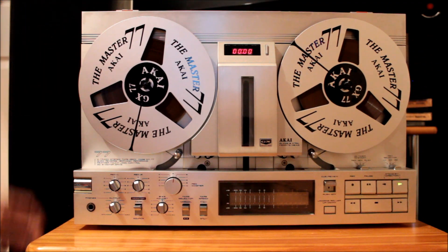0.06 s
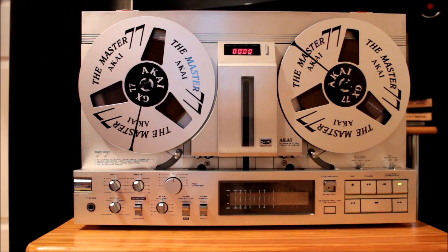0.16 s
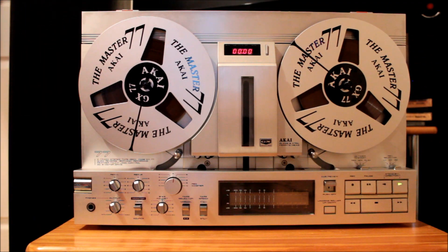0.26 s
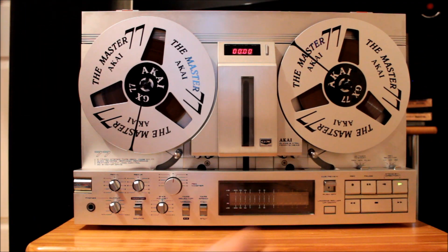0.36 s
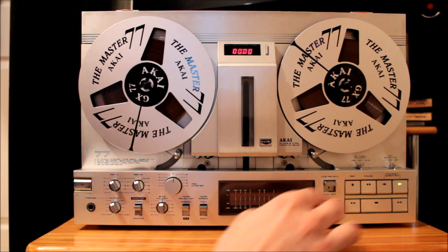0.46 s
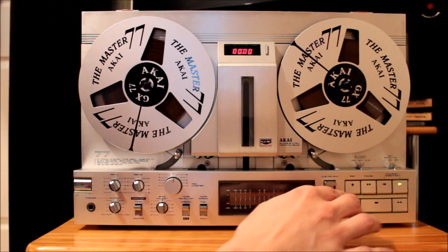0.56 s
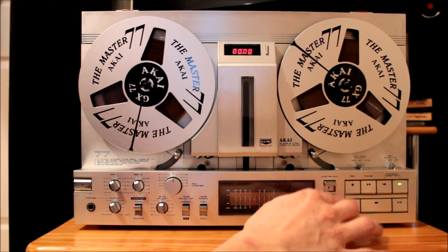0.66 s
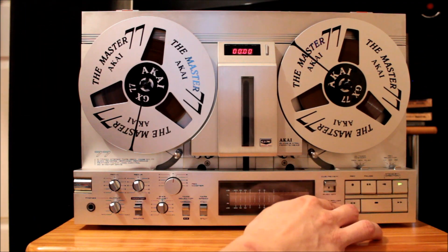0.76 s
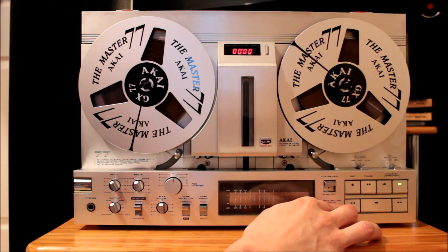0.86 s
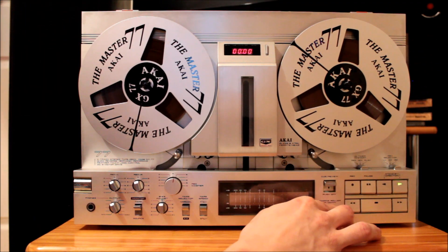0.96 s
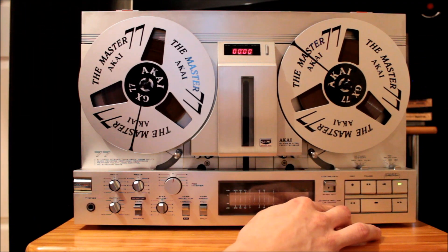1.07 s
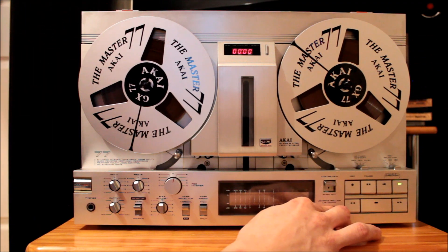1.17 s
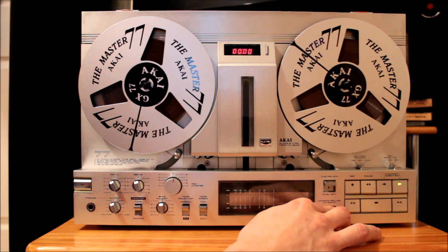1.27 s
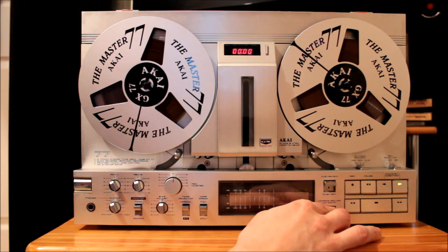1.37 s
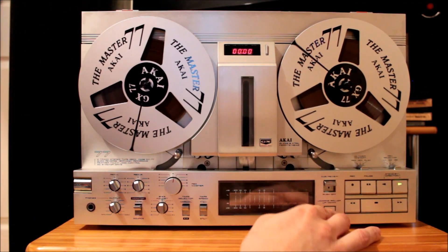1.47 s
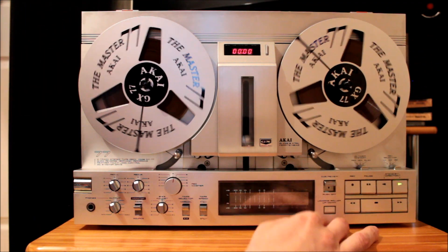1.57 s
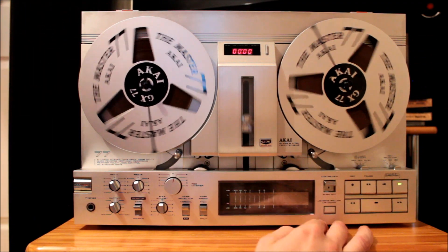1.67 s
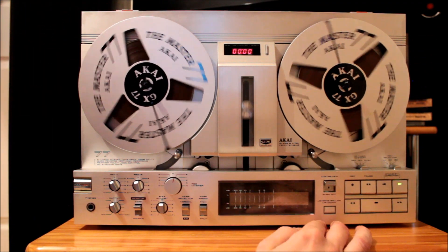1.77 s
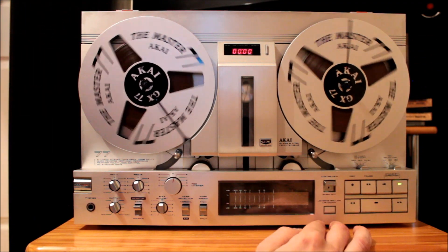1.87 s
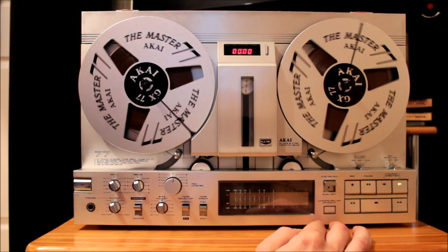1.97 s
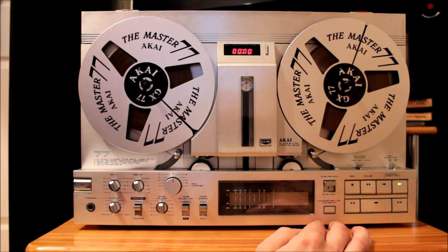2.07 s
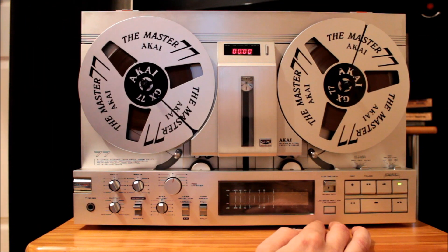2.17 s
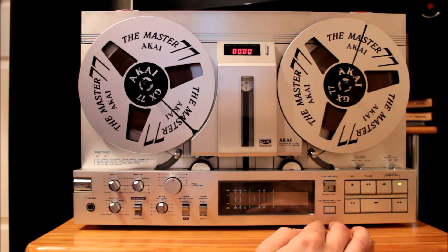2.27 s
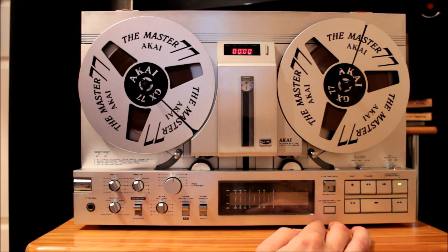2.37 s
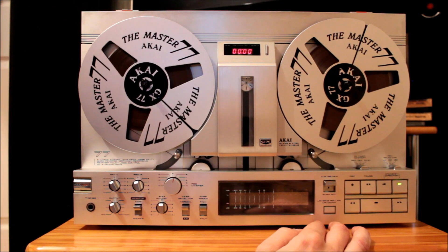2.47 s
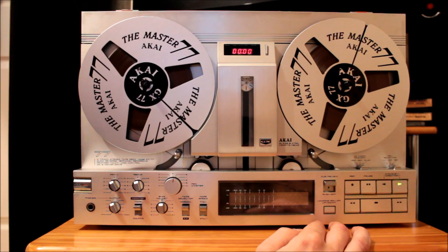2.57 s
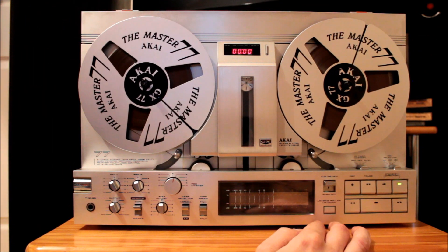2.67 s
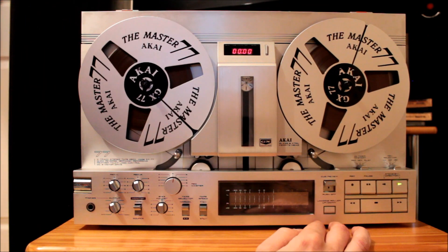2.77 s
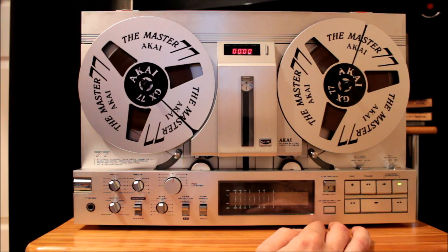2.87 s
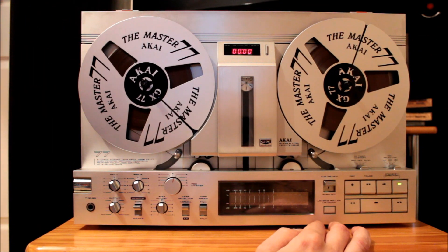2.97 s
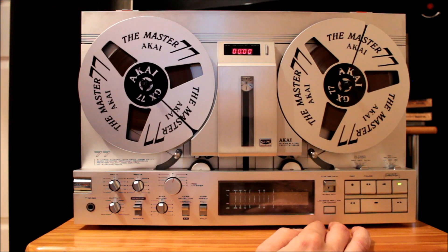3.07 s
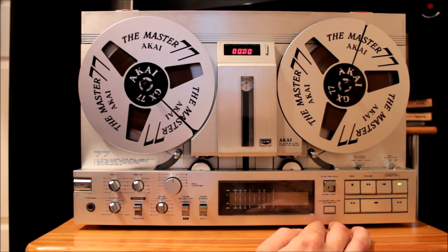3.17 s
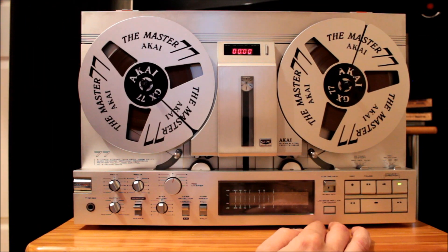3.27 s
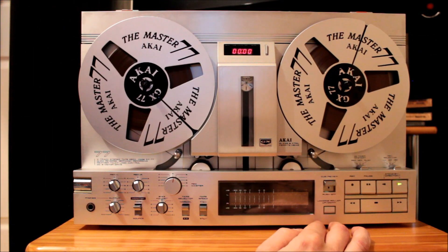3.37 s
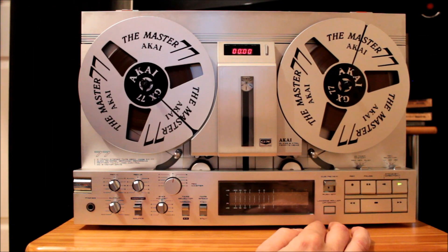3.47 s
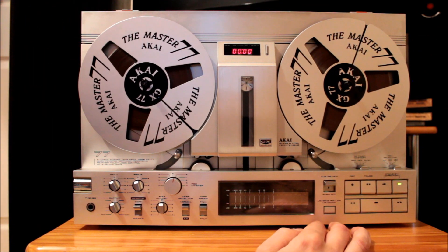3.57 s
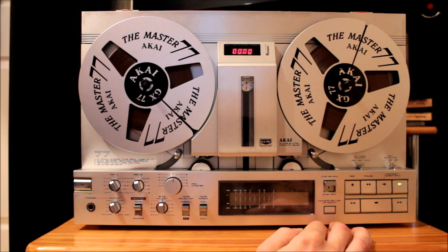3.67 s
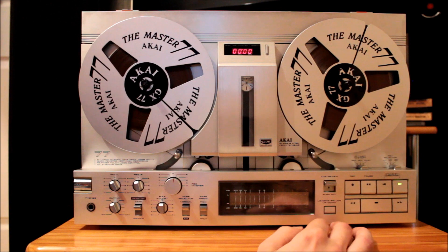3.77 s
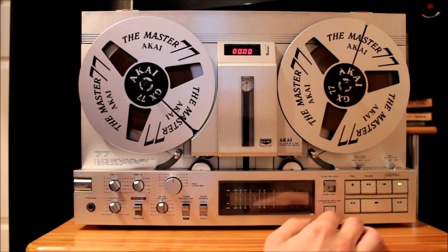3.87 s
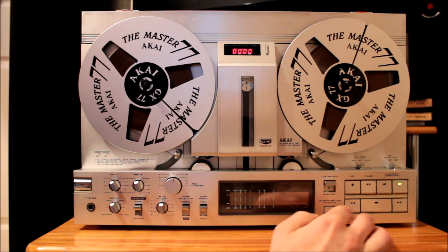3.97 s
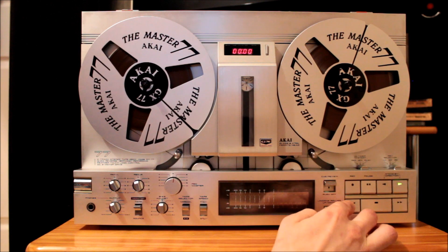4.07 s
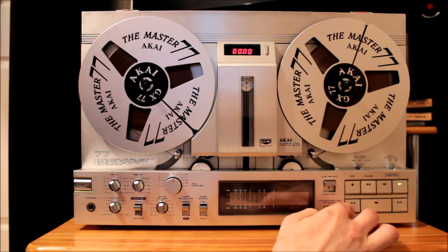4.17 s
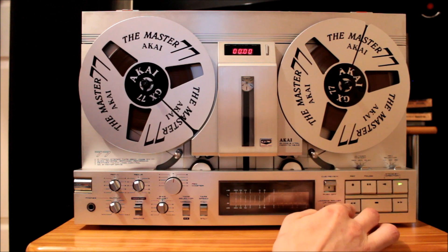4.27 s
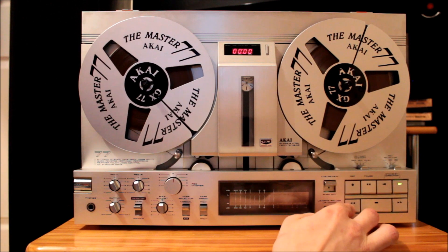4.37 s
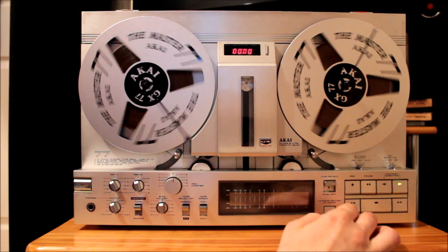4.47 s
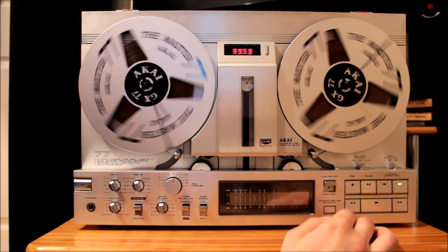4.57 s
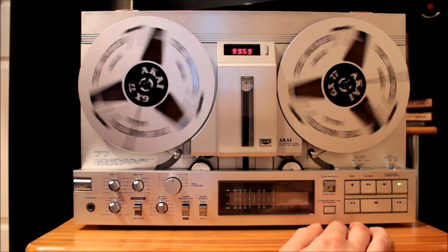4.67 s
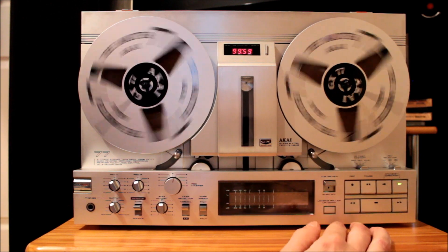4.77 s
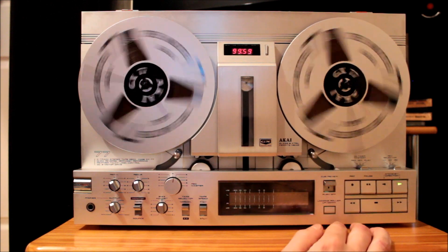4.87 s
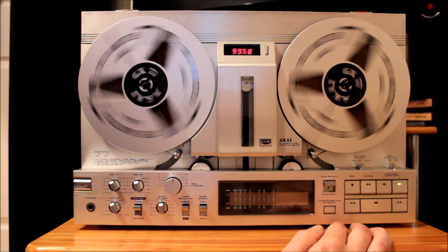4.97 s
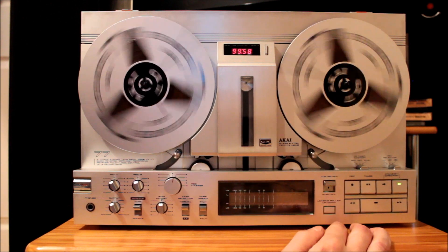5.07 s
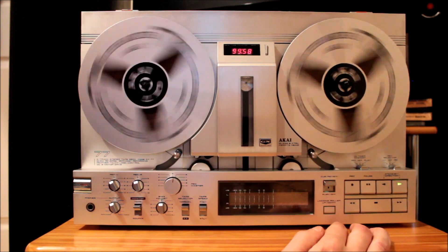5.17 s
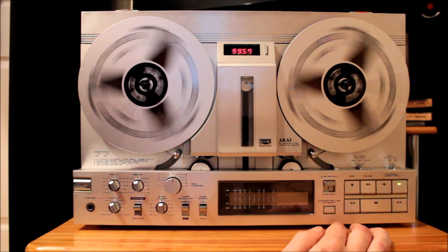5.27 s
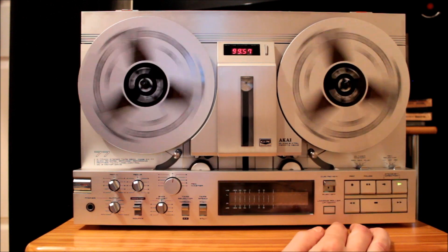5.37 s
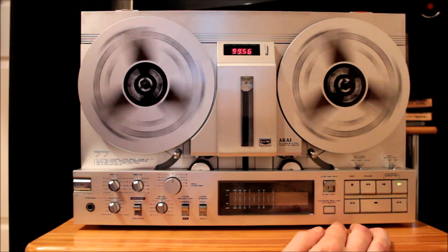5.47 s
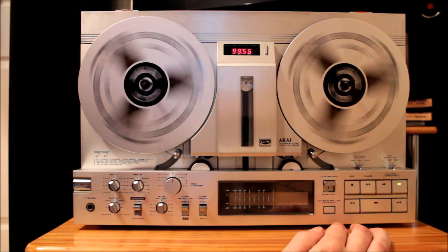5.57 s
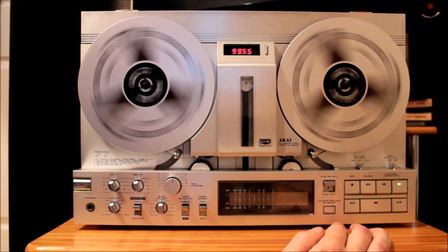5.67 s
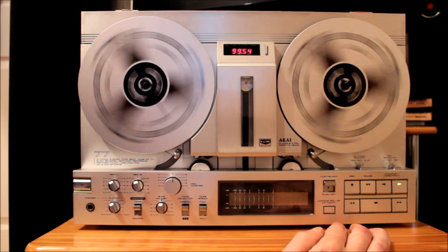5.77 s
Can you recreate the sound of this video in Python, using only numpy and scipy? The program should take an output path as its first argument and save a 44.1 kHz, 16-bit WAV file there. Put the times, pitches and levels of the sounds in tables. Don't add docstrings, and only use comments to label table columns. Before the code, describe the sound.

Faint sleeve rustle, then a tape deck's metallic key clacks and brief motor whir, a pause, a loud solenoid clunk, and hissing reels speeding up.

```python
import sys
import numpy as np
from scipy import signal
from scipy.fft import rfft, irfft
from scipy.io import wavfile
from scipy.ndimage import uniform_filter1d

SR = 44100
rng = np.random.default_rng(int(sys.argv[2]) if len(sys.argv) > 2 else 0)


def gain_from_db(level_db):
    decades = np.asarray(level_db, float) / 20
    return 10 ** decades


def transcribe(u):
    v = np.clip(np.atleast_2d(u).T, -1, 1)
    q = np.round(v * 32767).astype(np.int16)
    wavfile.write(sys.argv[1], SR, q)


N = 256662


def rms_one(x):
    return x / np.sqrt(np.mean(x ** 2) + 1e-20)


def level_curve(rows):
    time_s, level_db = np.transpose(rows)
    return np.interp(np.arange(N) / SR, time_s, level_db)


def at_hz(points, hz):
    point_hz, value = np.transpose(points)
    return np.interp(np.log(hz + 1), np.log(point_hz), value)


def coloured(spectrum):
    hz = np.fft.rfftfreq(N, 1 / SR)
    low_cut = 1 / (1 + (0.8 * spectrum[0][0] / (hz + 1)) ** 6)
    white = rfft(rng.standard_normal(N))
    return rms_one(irfft(white * gain_from_db(at_hz(spectrum, hz)) * low_cut, N))


def drift(rate_hz):
    knots_per_s = 40
    knots = rng.standard_normal(int(N / SR * knots_per_s) + 2)
    r = np.exp(-2 * np.pi * rate_hz / knots_per_s)
    wander = rms_one(signal.lfilter([1], [1, -r], knots))
    return np.interp(np.linspace(0, len(knots) - 1, N), np.arange(len(knots)), wander)


def resonance(x, hz, width_hz):
    r = np.exp(-np.pi * width_hz / SR)
    zeros = np.array([1, 0, -1]) * (1 - r * r) / 2
    return signal.lfilter(zeros, [1, -2 * r * np.cos(2 * np.pi * hz / SR), r * r], x)


def swell(s, rise_ms, t60_ms):
    t_ms = np.arange(int(0.4 * SR)) / SR * 1000
    rise_ms = max(rise_ms, 0.1)
    start = round(s * SR)
    decay = gain_from_db(-60 * (t_ms - rise_ms) / max(t60_ms, 1))
    return slice(start, start + len(t_ms)), np.minimum(t_ms / rise_ms, decay)


def contacts(rows, body_db, rise_ms):
    full = []
    for s, peak_db, high_db, t60_ms in rows:
        low_db = body_db + 0.6 * (peak_db + 26) - peak_db
        full.append((s, peak_db, low_db, high_db, rise_ms * gain_from_db(0.89 * high_db), t60_ms))
    return full


def rattle(rows, modes, rough_db):
    unevenness = np.minimum(rng.exponential(1, N), 3)
    grit = rms_one(rng.standard_normal((3, N)) * gain_from_db(rough_db * unevenness))
    drive = np.full((3, N), 1e-9)
    for s, peak_db, low_db, high_db, rise_ms, t60_ms in rows:
        at, shape = swell(s, rise_ms, t60_ms)
        drive[:, at] += gain_from_db(peak_db + np.array([[low_db], [0], [high_db]])) * shape
    hit = 0
    for level, grains, edges_hz in zip(drive, grit, [(300, 1000), (1000, 3500), (3500, 19000)]):
        evened = np.sqrt(SR / 2 / (edges_hz[1] - edges_hz[0]))
        band = signal.butter(3, edges_hz, "band", fs=SR, output="sos")
        hit = hit + evened * signal.sosfilt(band, level * grains)
    for hz, width_hz, db in modes:
        hit = hit + (gain_from_db(np.clip(db, -6, 8)) - 1) * resonance(hit, hz, width_hz)
    return hit


# (frequency [Hz], density [dB per Hz])
RUMBLE = [(15, -52), (25, -23), (59, -19), (82, -14.5), (134, -5), (156, -8), (220, 0), (257, -9),
          (290, -4.5), (321, -6.5), (468, -9.5), (659, -11.5), (977, -11), (1060, -13.5), (1500, -20.5),
          (1950, -31), (3300, -120)]
# (frequency [Hz], density [dB per Hz])
HISS = [(880, -51), (1500, -6), (1720, 3), (1870, -4), (3310, -8.5), (5330, -7), (7390, -11), (13100, -3.5),
        (16000, -7.5)]
# (frequency [Hz], width [Hz], level [dB rms])
ROOM_TONES = [(94, 6.9, -63), (139, 39, -76), (208, 15, -67), (232, 19, -61.5), (292, 40, -67.5),
              (1000, 16, -80)]


def room_floor():
    rumble_db, hiss_db = -50.5, -57
    white = rng.standard_normal(N)
    tones = sum(gain_from_db(db) * rms_one(resonance(white, hz, width_hz)) for hz, width_hz, db in ROOM_TONES)
    rumble = gain_from_db(rumble_db - 0.5 + 0.24 * drift(5.6)) * coloured(RUMBLE)
    return rumble + tones + gain_from_db(hiss_db) * coloured(HISS)


# (start [s], attack [s], end of hold [s], level [dB])
SLEEVE = [
    (0.0, 0.2, 0.31, -52.5),
    (0.382, 0.21, 0.61, -55.5),
    (.722, .012, 0.69, -67),
    (.82, .012, .9, -65),
    (1.096, .012, 1.11, -59),
]
# (frequency [Hz], density [dB per Hz])
CLOTH = [(1200, -12), (2200, -3.5), (4000, -5), (8000, -10), (12000, -11), (15500, -15)]


def sleeve():
    rest_db, fade_db_per_s = 14, 149.5
    t, level = np.arange(N) / SR, 0
    for s, attack_s, end_s, db in SLEEVE:
        rising_db = rest_db * (np.clip((t - s) / max(attack_s, 0.001), 0, 1) - 1)
        fading_db = fade_db_per_s * np.maximum(t - end_s, 0)
        level = level + (t >= s) * gain_from_db(db + rising_db - fading_db)
    return level * coloured(CLOTH)


PARTS = {"tabletop": (30, 220, 70), "cabinet": (8, 205, 25), "panel": (5.6, 110, 120),
         "lever": (2.4, 40, 420), "spring": (3.2, 58, 240), "cover": (3, 150, 900),
         "armature": (4, 78, 400), "bell": (5, 300, 40), "shield": (2.4, 250, 1200),
         "plunger": (1, 16, 300), "pawl": (.2, 4, 3000)}
THUDS = {"tabletop": [(1.300, -36, 235.5), (2.030, -40, 187.5), (2.150, -41, 289), (4.510, -37.5, 247.5),
         (4.550, -33, 232)], "cabinet": [(1.268, -27.5, 431), (1.486, -36, 431), (2.135, -30, 400)],
         "panel": [(1.345, -29, 661), (1.600, -41, 630), (2.030, -29.5, 639), (2.130, -30, 655)]}
PINGS = {"lever": [(1.129, -52, 1900), (1.246, -33, 1990), (1.322, -17.5, 1400), (1.439, -31, 1063),
         (1.565, -27, 1450), (2.028, -27, 1285), (2.029, -29, 2250), (2.128, -24, 1790), (1.487, -22, 1700),
         (2.029, -30, 1750)], "spring": [(1.270, -21, 2440), (1.325, -26, 2610), (1.486, -17, 2550),
         (1.564, -24, 2550), (1.578, -29, 2580), (1.607, -26, 2600), (1.650, -34, 2495), (1.678, -38, 2703),
         (4.396, -41, 2610)], "cover": [(1.600, -28, 5390), (2.150, -41, 5640), (4.393, -42, 7550),
         (4.393, -44, 15000),], "shield": [(4.504, -26, 3450), (4.508, -37, 6100)],
         "armature": [(4.490, -24, 1180), (4.496, -21, 1550), (4.493, -21, 1870)],
         "bell": [(4.502, -35, 3160), (4.505, -41, 1102)], "plunger": [(4.4988, -6.5, 3500)],
         "pawl": [(1.2783, -9, 3500), (1.6062, -11, 4500), (1.3225, -14, 1500), (4.4998, -5, 3000)]}


def rings():
    out = np.zeros(N)
    for part, strikes in {**THUDS, **PINGS}.items():
        rise_ms, t60_ms, spread_hz = PARTS[part]
        for s, peak_db, hz in strikes:
            at, shape = swell(s, rise_ms, t60_ms)
            t = np.arange(len(shape)) / SR
            detune, phase = rng.random((2, 30, 1))
            cycles = t * (hz + spread_hz * (detune - 0.5)) + phase
            neighbours = 0.25 * np.sin(2 * np.pi * cycles).sum(axis=0)
            out[at] += gain_from_db(peak_db) * shape * (0.5 * np.sin(2 * np.pi * hz * t) + neighbours)
    return out


# (time [s], peak rms [dB], highs [dB], t60 [ms])
LEVERS = [(1.2462, -34, -7, 63), (1.2655, -22.5, 1.5, 106), (1.2765, -20.5, -5, 39), (1.2885, -29, -1, 50),
          (1.3040, -37, -8, 120), (1.3215, -24.5, -10, 71), (1.3320, -32, -10, 110),
          (1.3575, -32, 1.5, 140), (1.4385, -42.5, -23, 55), (1.4805, -26, 1, 37), (1.4845, -17, 3, 43),
          (1.4930, -27.5, 0, 62), (1.5120, -28.5, 0.5, 105), (1.5640, -30.5, -7, 100), (1.5890, -25, 5, 37),
          (1.5955, -24, 5.5, 42), (1.6045, -25.5, 4.5, 45), (1.6150, -24, -2, 34), (1.6300, -34, 3, 93),
          (1.6790, -39.5, -12, 260), (2.0280, -30, -31, 46), (2.0930, -23.5, 1.5, 57),
          (2.1040, -32, -7, 130), (2.1150, -32.5, -0.5, 160), (2.1295, -22, -0.5, 30),
          (2.1380, -35.5, -5, 140), (2.1600, -47, -1, 49)]
# (frequency [Hz], width [Hz], gain [dB])
CHASSIS = [(431, 21, 8), (655, 43, 8), (1224, 120, 3.5), (2400, 75, 3.5), (3890, 160, 3), (5300, 800, 5),
           (9800, 1800, 2)]


def levers():
    return rattle(contacts(LEVERS, body_db=-35, rise_ms=2.6), CHASSIS, rough_db=1.5)


# (time [s], level [dB])
LOADING = [
    (1.30, -60.5),
    (1.40, -41.5),
    (1.60, -52.5),
    (1.80, -45),
    (2.15, -41),
    (2.24, -77),
    (2.34, -84),
]
# (frequency [Hz], density [dB per Hz])
MOTOR = [(250, -2), (400, -2.5), (760, -1), (1150, -4.5), (1700, -8), (2300, -14), (3200, -18),
         (6000, -25.5), (15000, -28)]
# (multiple of rotation, level [dB])
MOTOR_LINES = [(2, -6), (3, -7.5), (4, 1), (5, -7), (6, -9)]


def loading_motor():
    motor_hz, full_speed_db, sag_hz_per_db = 191.6, -53, 0.13
    level_db = level_curve(LOADING)
    hz = motor_hz + sag_hz_per_db * np.minimum(level_db - full_speed_db, 0)
    turns = 2 * np.pi * np.cumsum(hz * (1 + 0.00591 * drift(5.74))) / SR
    lines = 0
    for k, db in MOTOR_LINES:
        lines = lines + gain_from_db(db + 1.6 * drift(2.2)) * np.sin(k * turns + 6 * rng.random())
    gears = coloured(MOTOR) * gain_from_db(1.2 * drift(10))
    running = level_db > -74
    return gain_from_db(level_db) * running * (gears + gain_from_db(-2.5) * lines)


# (time [s], peak [dB])
TICKS = [
    (2.0800, -48),
    (2.1940, -50),
    (2.2200, -46),
    (2.2400, -51),
    (2.2490, -32),
    (2.2590, -47),
]


def ticks():
    out, white = np.zeros(N), rng.standard_normal(N)
    for s, peak_db in TICKS:
        at, shape = swell(s, 0.38, 5.7)
        out[at] += gain_from_db(peak_db + 5) * shape * white[at]
    return signal.sosfilt(signal.butter(2, 12000, "high", fs=SR, output="sos"), out)


# (time [s], peak rms [dB], highs [dB], t60 [ms])
SOLENOID = [(4.2825, -49, -28, 70), (4.3060, -51, -16, 24), (4.3560, -41.5, -19, 57),
            (4.3825, -45, -23, 24), (4.3905, -36.5, 1.5, 45), (4.4010, -35, -9, 64), (4.4225, -49, 2, 33),
            (4.4845, -31, -30, 20), (4.4885, -22, 1, 50), (4.4935, -23, -3, 40), (4.4985, -16, -1, 22),
            (4.5053, -20, -3, 30), (4.5110, -44, -15, 25), (4.5250, -39, -22, 170)]
# (frequency [Hz], width [Hz], gain [dB])
BRAKE = [(820, 93, 8), (1140, 150, 5.5), (1870, 90, 2), (3440, 160, -1), (4360, 260, 5.5), (5900, 1100, 7),
         (10000, 1700, 7)]


def solenoid():
    return rattle(contacts(SOLENOID, body_db=-35.5, rise_ms=2.3), BRAKE, rough_db=4.0)


# (time [s], level [dB])
WIND = [
    (4.55, -60),
    (4.70, -52),
    (5.45, -47.5),
    (5.82, -45),
]
# (frequency [Hz], density [dB per Hz])
TAPE = [(350, -1), (600, 1.5), (870, 2.5), (1150, -0.5), (1800, -9.5), (2200, -6.5), (3000, -7), (4200, -4),
        (5200, -8), (6000, -9.5), (9000, -11), (12300, -12.5), (15500, -9.5)]
# (frequency [Hz], width [Hz], gain [dB])
GUIDES = [(847, 22, 6.5), (2240, 180, 4.5), (4250, 900, -6.5), (5190, 220, 3), (8150, 210, 2),
          (12400, 550, 6.5)]
# (hiss level [dB], whistle level [dB])
WHISTLE = [(-65, -96), (-57, -74), (-47, -52.5), (-44, -57)]


def fast_wind():
    hiss_db = level_curve(WIND)
    whistle_db = np.interp(hiss_db, *np.transpose(WHISTLE))
    whistle_hz = 4280 * (1 + 0.0078 * drift(1.2))
    friction = coloured(TAPE)
    tape = friction
    for hz, width_hz, db in GUIDES:
        tape = tape + (gain_from_db(db) - 1) * resonance(friction, hz, width_hz)
    low_pass = signal.butter(2, 230, fs=SR, output="sos")
    narrow = signal.sosfilt(low_pass, rng.standard_normal((2, N)))
    turns = 2 * np.pi * np.cumsum(whistle_hz) / SR
    whistle = rms_one(narrow[0] * np.sin(turns) + narrow[1] * np.cos(turns))
    return gain_from_db(hiss_db + 0.62 * drift(9.9)) * tape + gain_from_db(whistle_db + 1.2 * drift(15)) * whistle


# (frequency [Hz], t60 [s])
ROOM_T60 = [(200, 0.85), (1000, 0.34), (4000, 0.31), (15000, 0.23)]


def room(x):
    t = np.arange(int(0.6 * SR)) / SR
    white, tail = rng.standard_normal((2, len(t))), 0
    for k, low_hz in enumerate(150 * 2.0 ** np.arange(7)):
        octave = signal.butter(2, [low_hz, 2 * low_hz], "band", fs=SR, output="sos")
        decay = gain_from_db(-60 * t / at_hz(ROOM_T60, np.sqrt(2) * low_hz))
        tail = tail + signal.sosfilt(octave, white[k % 2]) * decay
    lines = rfft(tail * np.clip((t - 0.003) / 0.0056, 0, 1))
    power = np.abs(lines) ** 2
    even = np.sqrt(uniform_filter1d(power, size=1200) / uniform_filter1d(power, size=90))
    tail = irfft(lines * even, len(t))
    return signal.fftconvolve(x, tail / np.sqrt(np.sum(tail ** 2)))[:N]


def scene():
    blows = rings() + levers() + ticks()
    brake = solenoid()
    echoes = gain_from_db(-11) * room(blows) + gain_from_db(-9) * room(brake)
    deck = blows + brake + echoes + loading_motor() + fast_wind()
    return (room_floor() + sleeve() + deck)[None]


def roll_off(x):
    return signal.sosfilt(signal.butter(12, 16380, fs=SR, output="sos"), x)


def record(dry):
    rounded = 1.5 * np.tanh(dry / 1.5)
    low_pass = signal.cheby2(18, 50, 15960, fs=SR, output="sos")
    mix = signal.sosfilt(low_pass, rounded)
    return roll_off(mix)


dry = scene()
out = record(dry)
transcribe(out)
```